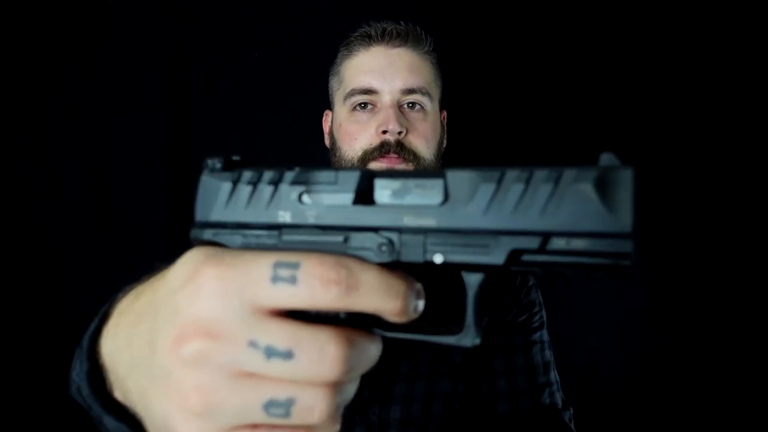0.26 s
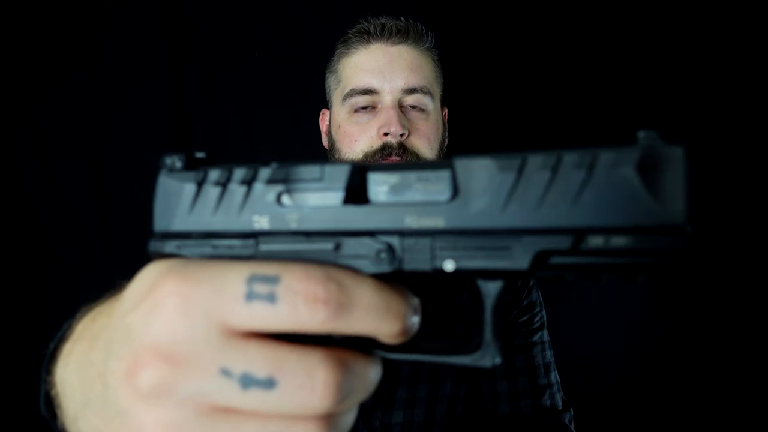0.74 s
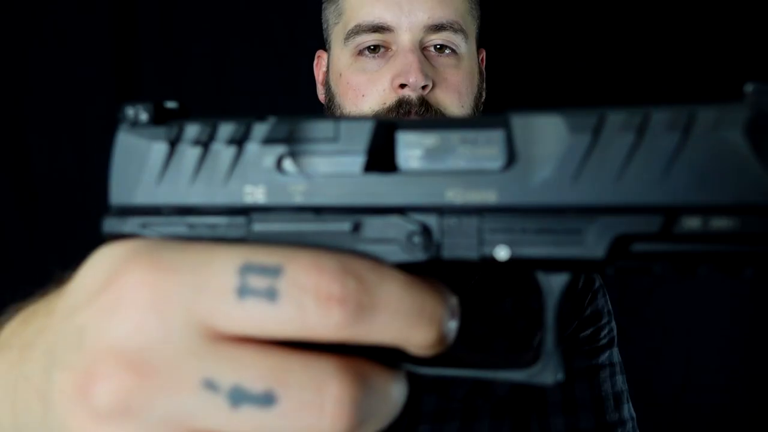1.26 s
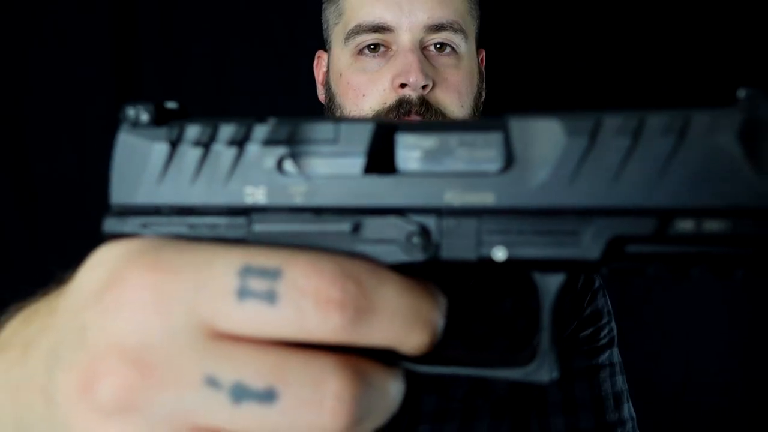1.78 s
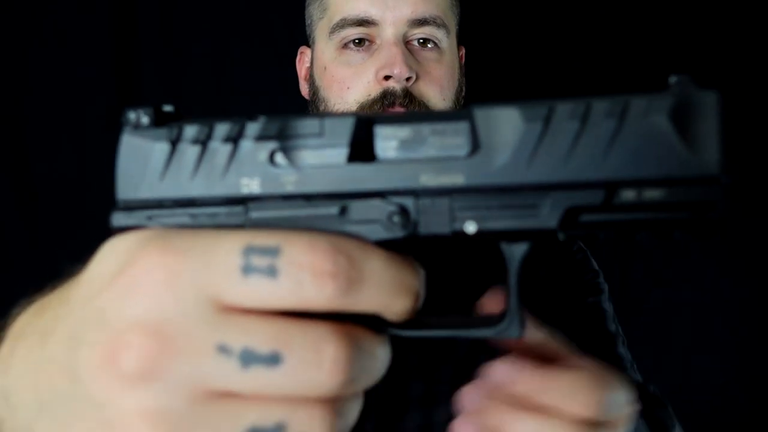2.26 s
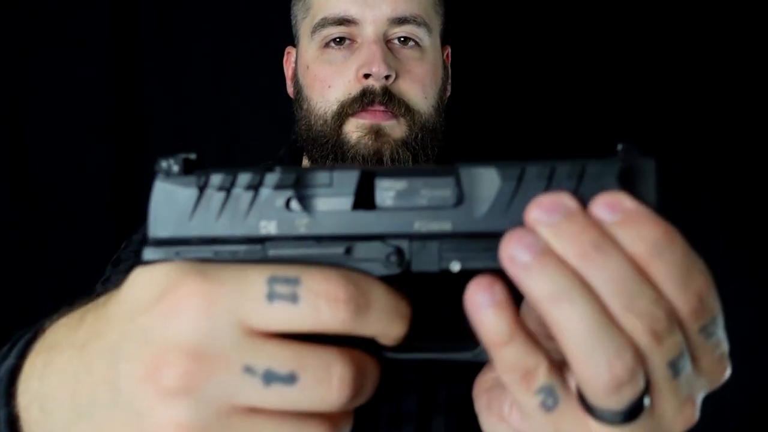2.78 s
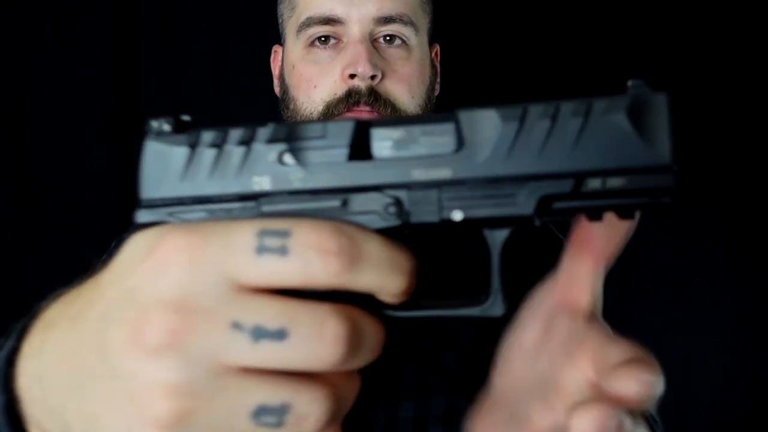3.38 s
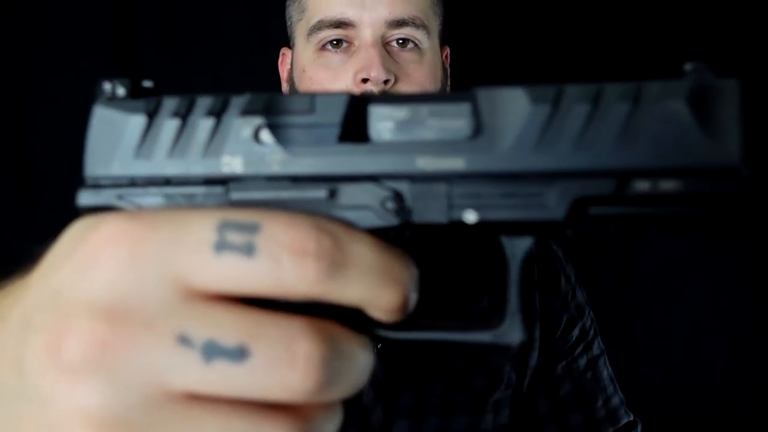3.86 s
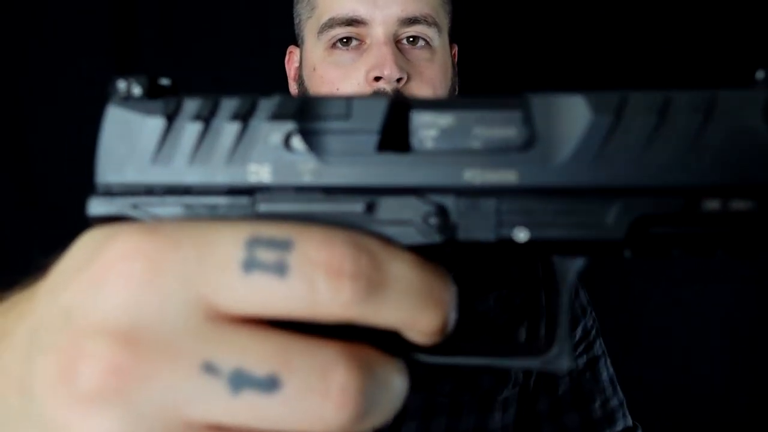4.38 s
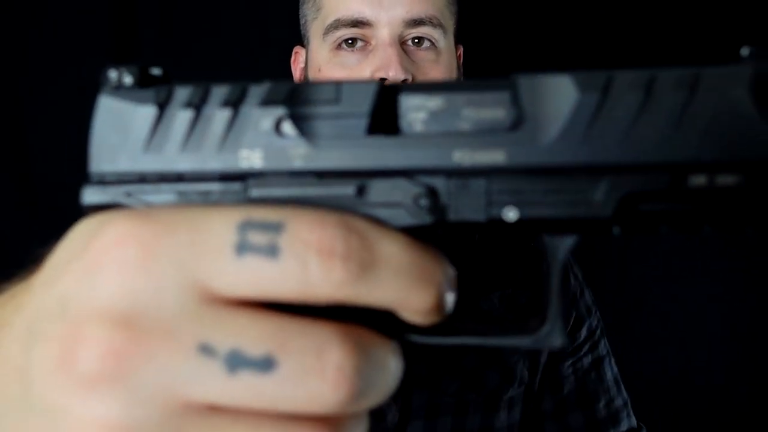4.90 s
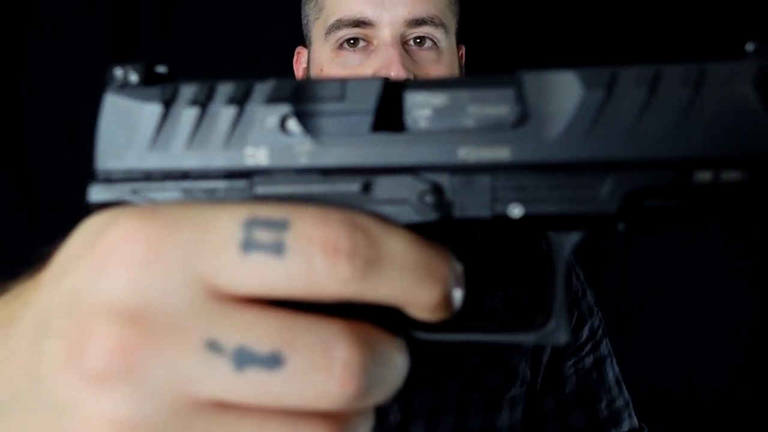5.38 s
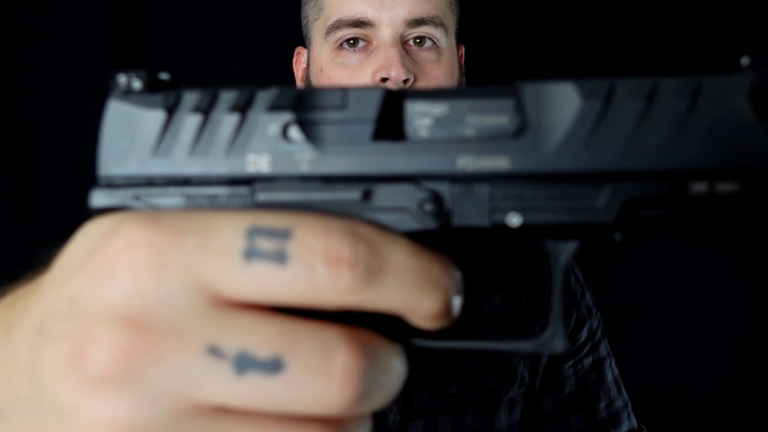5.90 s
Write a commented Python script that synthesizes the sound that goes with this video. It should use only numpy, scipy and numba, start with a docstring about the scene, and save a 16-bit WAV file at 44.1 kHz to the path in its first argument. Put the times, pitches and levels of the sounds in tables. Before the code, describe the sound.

A nearby microphone catches dry-firing indoors: a light tick, a sharp striker snap with tiny bounces, a dull cloth slap, then the two-part clatter of a slide pulled and released. After a quiet gap with faint fabric rustles come two small trigger clicks and another snap. Bright half-second room echoes follow the snaps and rack, with soft rumbling room noise throughout and a low drone only early on.

```python
"""Ticks, snaps and metallic clacks in a bare room: an unloaded pistol is dry-fired close by, a hand slaps cloth
and the slide is racked, over a low rumble, a drone and hiss.
Each contact is a click and a noise rattle through broad modes, plus a noise-built room tail; the barrel is
sines and the background is coloured noise. A compressor squashes the loud blows so that their echoes swell."""
import sys
import numpy as np
from scipy import signal
from scipy.fft import rfft, irfft, next_fast_len
from scipy.io import wavfile
from scipy.ndimage import uniform_filter1d, minimum_filter1d, map_coordinates
from numba import njit

SR = 44100
rng = np.random.default_rng(int(sys.argv[2]) if len(sys.argv) > 2 else 0)


def unload_wav(signal):
    """Save mono or channel-first audio to the path in sys.argv[1] as 16-bit WAV at rate SR, clipped to [-1, 1]."""
    wavfile.write(
        sys.argv[1],
        SR,
        np.round(np.clip(np.atleast_2d(signal).T, -1, 1) * 32767).astype(np.int16),
    )


N = 270729

# Rumble level. Each row: time in seconds, level in dB.
RUMBLE_LEVEL = [(0, -51), (2.5, -57), (3, -51), (3.2, -66), (3.55, -62.5), (4.3, -59), (5.25, -55),
                (5.9, -48), (6.14, -48)]
# Noise spectra. Each row: frequency in Hz, relative density in dB per Hz.
RUMBLE_SPECTRUM = [(12, -72.5), (20, -38), (43, -39), (57, -24), (92, -9.5), (124, -12.5), (151, -2.5),
                   (209, -11), (274, 0), (325, -3), (354, -14), (420, -11), (600, -18.5), (780, -45.5),
                   (1320, -120)]
HISS_SPECTRUM = [(240, -29.5), (400, -10.5), (650, -6.5), (900, -12.5), (1750, -18.5), (2400, -24.5),
                 (4500, -31), (8300, -37), (15300, -39.5), (16500, -57.5)]
DRONE_SPECTRUM = [(53, -42.5), (90, -14), (113, -5), (145, -12.5), (177, -2.5), (248, 1), (322, -6.5),
                  (351, -13.5), (420, -16), (550, -46), (920, -120)]
WHIRR_SPECTRUM = [(1500, -40.5), (2300, 0.5), (2600, 2), (3300, -6), (4500, -19), (6000, -57)]
CLOTH_SPECTRUM = [(1500, -53), (3000, -3.5), (5000, -3), (7000, -4), (10000, -5.5), (16000, -12)]
# Stereo width of background and echoes. Each row: frequency in Hz, left-right likeness from 0 to 1.
BACKGROUND_LIKENESS = [(60, 0.9), (180, 1), (550, 0.7), (1650, 0.36), (4970, 0.15), (15000, 0.53)]
ECHO_LIKENESS = [(100, 0.98), (300, .98), (700, .88), (1650, 0.77), (5000, 0.72), (15000, 0.7)]
# Room decay. Each row: frequency in Hz, time to fall 60 dB in seconds.
ROOM_T60 = [(200, 0.73), (500, 0.53), (1000, 0.63), (3000, 0.58), (7000, 0.51), (12000, 0.36),
            (16000, 0.24)]
# Late filling of the echoes. Each row: frequency in Hz, share missing at the start.
LATE_SHARE = [(1000, 0.0088), (2500, 0.33), (10000, 0.21)]
# Faint cloth rustles. Each row: start in seconds, rise and fall time constants in seconds, level in dB.
RUSTLES_AT = [(2.301, 0.076, 0.18, -60.5), (3.799, 0.015, 0.15, -64), (5.14, 0.051, 0.096, -56)]

# Contacts: hand on cloth, slide on its rails, slide drawn back, slide running home, trigger taking up, letting go.
# Each row: start in seconds, blow energy in dB, tilt in dB per octave, room level in dB relative to the blow.
SLAP_BLOWS = [(2.0835, -3, -1, 0), (2.0915, 1, 1.3, 0.0047)]
RAIL_BLOWS = [(2.8697, 1.7, -5, -8), (2.9805, 7.5, 0.5, 6)]
DRAW_BLOWS = [(2.9045, 5.4, -5.5, -0.5), (2.918, 11, -1.5, -6.5), (2.931, 1.5, 1, 1)]
SLAM_BLOWS = [(3.1405, 0, -3.5, -9.5), (3.143, 6, -3.5, -3.5), (3.1485, 15.5, 0.5, 7.5)]
TICK_BLOWS = [(.5225, -7.5, -2, -6.5)]
RESET_BLOWS = [(5.5875, -7, 0.53, -2.5), (5.7355, -13.5, 0.75, -8.5)]
# Modes of the struck parts. Each row: centre in Hz, width in Hz, level in dB before the blow's tilt.
HAND_MODES = [(216.7, 29, 2.5), (290, 65, -2.5), (417, 190, -3), (846, 630, -7), (1293, 700, -14.5),
              (2460, 340, -25.5), (5900, 2100, -38.5)]
SLIDE_MODES = [(1300, 3800, -5), (2200, 850, 1), (3240, 500, 2), (4100, 280, -25), (5150, 1300, -9),
               (6970, 430, 7.5), (8600, 1900, -6), (11000, 2200, -4.5), (14500, 4000, -13.5)]
RAIL_MODES = [(1220, 160, -10.5), (2040, 530, -9.5), (2850, 150, -3), (3790, 230, 1.5), (5270, 1400, -11.5),
              (6400, 180, 0.5), (9150, 3000, -6), (11400, 3100, -2), (13900, 2500, -4)]
BREECH_MODES = [(813, 96, -16.5), (1549, 440, -7.5), (2440, 820, -9.5), (3410, 460, -2.5), (5230, 1200, -7),
                (5946, 280, -1), (7010, 420, -2), (8140, 650, -4), (10100, 2000, -6.5),
                (13900, 1000, -11.5), (15400, 1000, -15)]
TRIGGER_MODES = [(1230, 160, -7), (2600, 660, -4), (3200, 700, 0), (4210, 500, -0.5), (7400, 1400, -11.5),
                 (10200, 2800, -13), (12500, 2600, -16)]
SEAR_MODES = [(1080, 420, -2), (2195, 250, 1.5), (3380, 1200, -2.5), (5147, 1200, -6.5), (6800, 1300, -6),
              (9200, 3400, -11.5), (13500, 4000, -15.5)]
STRIKER_MODES = [(1160, 59, 1), (1900, 450, -8), (3000, 710, 4), (3770, 1500, 1), (5270, 1400, -3),
                 (7000, 1000, -4), (8280, 700, -1.5), (9810, 680, 3.5), (11800, 2000, -10.5),
                 (16200, 1500, -2)]
# Barrel partials. Each row: frequency in Hz, time to fall 60 dB in seconds.
BARREL_PARTIALS = [(6800, 0.047), (13700, .3)]
# Knocks on the barrel. Each row: start in seconds, level in dB, overtone in dB relative to the fundamental.
BARREL_KNOCKS = [(2.9061, -7.5, -26), (2.921, -11, -33), (2.928, -26.5, -12)]
# Striker falls. Each row: start in seconds, reference blow energy in dB.
STRIKER_FALLS = [(1.658, 14), (6.0938, 9.5)]
# Release, blow and two bounces of a fall. Each row: delay in seconds, energy in dB relative to the reference,
# tilt in dB per octave, room level in dB relative to the contact.
FALL_CONTACTS = [(0, -14.5, -8, -4.5), (.0023, 3.5, 2.5, 2), (.0069, -3, 2, 0), (0.0115, -10, 0, 5)]
# Frame jolts at the blow and first bounce. Each row: delay in seconds, level in dB relative to the reference.
FRAME_JOLTS = [(.0024, -10), (.0066, -22.5)]

HISS_START_DB, HISS_FOLLOW_SHARE = -58, 0.41  # share of the rumble's dB swings
DRONE_DB, WHIRR_DB = -50, -65  # before their common fade
FADE_START_S, FADE_DB_PER_S = 2.35, 52.5
WALL_DELAY_S, WALL_DB = .0047, -16  # nearest surface
LOW_CUT_HZ, TOP_HZ, TOP_EDGE_HZ = 27, 16500, 800


def amp(db):
    """Gain of a dB value."""
    return 10 ** (np.asarray(db) / 20)


def unit(x):
    """x at rms 1."""
    return x / np.sqrt(np.mean(x ** 2) + 1e-20)


def along(points, hz):
    """Interpolate (Hz, value) points on a log frequency axis."""
    f, v = np.transpose(points)
    return np.interp(np.log(hz + 1), np.log(f + 1), v)


def curves(rows):
    """One value per sample for each column after the time."""
    s, *cols = np.transpose(rows)
    return [np.interp(np.arange(N) / SR, s, c) for c in cols]


def wobble(rate_hz):
    """A smooth random curve with rate_hz knots a second."""
    knots = rng.standard_normal(int(N * rate_hz / SR) + 4)
    return map_coordinates(knots, [np.arange(N) * rate_hz / SR])


def filtered(x, response):
    """x through a complex response of frequency, zero-padded."""
    m = next_fast_len(x.shape[-1] + 8192)
    spectrum = rfft(x, m) * response(np.fft.rfftfreq(m, 1 / SR))
    return irfft(spectrum, m)[..., :x.shape[-1]]


def paired(pair, likeness):
    """Mix two unrelated signals to a left-right likeness per frequency."""
    def mid_side_gains(hz):
        turn = np.arccos(np.clip(along(likeness, hz), -1, 1)) / 2
        return np.array([np.cos(turn), np.sin(turn)])
    mid, side = filtered(pair, mid_side_gains)
    return np.array([mid + side, mid - side])


def rush(spectrum, likeness):
    """Coloured stereo noise of rms 1."""
    noise = paired(rng.standard_normal((2, N)), likeness)
    return unit(filtered(noise, lambda hz: amp(along(spectrum, hz))))


def add(out, s, x):
    """Mix x into out from time s."""
    part = out[:, round(s * SR):][:, :x.shape[1]]
    part += x[:, :part.shape[1]]


def background():
    """Lumpy rumble noise and a hiss that partly follows it; drone and narrow hiss fade away together."""
    rumble_db, = curves(RUMBLE_LEVEL)
    rumble = amp(rumble_db) * unit(amp(2 * wobble(18)) * rush(RUMBLE_SPECTRUM, BACKGROUND_LIKENESS))
    hiss_db = HISS_START_DB + HISS_FOLLOW_SHARE * (rumble_db - rumble_db[0])
    hiss = amp(hiss_db) * rush(HISS_SPECTRUM, BACKGROUND_LIKENESS)
    drone = amp(DRONE_DB) * unit(amp(2.7 * wobble(17)) * rush(DRONE_SPECTRUM, BACKGROUND_LIKENESS))
    whirr_db = WHIRR_DB + 1.1 * wobble(29) + 1.5 * wobble(3.4)
    whirr = amp(whirr_db) * rush(WHIRR_SPECTRUM, BACKGROUND_LIKENESS)
    fade_db = FADE_DB_PER_S * np.maximum(np.arange(N) / SR - FADE_START_S, 0)
    return rumble + hiss + amp(-fade_db) * (drone + whirr)


def rustle():
    """Cloth friction: soft, grainy swells of treble noise."""
    t, swell = np.arange(N) / SR, np.zeros(N)
    for s, rise_s, fall_s, db in RUSTLES_AT:
        since = np.maximum(t - s, 0)
        swell += amp(db) * (1 - np.exp(-since / rise_s)) * np.exp(-since / fall_s)
    return swell * amp(2 * wobble(60)) * rush(CLOTH_SPECTRUM, ECHO_LIKENESS)


def echoes(x):
    """Convolve with a fresh noise tail that builds up, each frequency dying at its own speed."""
    hz, t, z = signal.stft(rng.standard_normal((2, SR)), SR, nperseg=256)
    late = np.clip(along(LATE_SHARE, hz)[:, None], 0, 1)
    fill = 1 - late * np.exp(-(t / .07) ** 2)
    decay = amp(-60 * t / along(ROOM_T60, hz)[:, None])
    tail = signal.istft(z * fill * decay, SR, nperseg=256)[1]
    build_up = 1 - np.exp(-np.arange(tail.shape[1]) / SR / 0.0018)
    tail = paired(tail * build_up, ECHO_LIKENESS)
    return signal.fftconvolve(x[None], tail / np.linalg.norm(tail[0]), axes=1)


def rung(push, modes, tilt_db):
    """A push through broad resonances, low-cut just under the first; energy 1."""
    low = 0.89 * modes[0][0]
    pivot = modes[2][0]  # the tilt turns about the third mode

    def response(f):
        body = 0
        for k, (c, w, db) in enumerate(modes):
            gain = (-1) ** k * amp(db + tilt_db * np.log2(c / pivot))
            body = body + gain * 1j * f * w / (c * c - f * f + 1j * f * w)
        low_cut = f * f / (f * f - low * low - 1.2j * f * low + 1)
        return body * low_cut ** 2

    x = filtered(push, response)
    return x / np.linalg.norm(x)


def struck(rows, modes, rattle_s, sharp=5):
    """Each contact: a direct click and decaying rattle, a wall reflection, and an impulse spread by the room."""
    out, t = np.zeros((2, N)), np.arange(SR // 10) / SR
    for s, db, tilt_db, room_db in rows:
        push = np.exp(-t / rattle_s) * rng.standard_normal(len(t)) + sharp * (t == 0)
        direct = amp(db) * rung(push, modes, tilt_db) * np.ones((2, 1))
        add(out, s, direct)
        add(out, s + WALL_DELAY_S, amp(WALL_DB) * direct)
        add(out, s, amp(db + room_db) * echoes(rung(1 * (t == 0), modes, tilt_db)))
    return out


def slap():
    """The free hand slaps cloth: a long contact through low modes."""
    return struck(SLAP_BLOWS, HAND_MODES, 0.0054, sharp=12)


def barrel():
    """Knocked by the slide, the barrel sings briefly: two decaying sines with a common phase waver."""
    out, t = np.zeros((2, N)), np.arange(SR // 3) / SR
    for s, ring_db, overtone_db in BARREL_KNOCKS:
        waver = np.cumsum(rng.normal(0, 0.11, len(t)))
        ring = 0
        for (hz, t60_s), db in zip(BARREL_PARTIALS, (0, overtone_db)):
            ring = ring + amp(db - 60 * t / t60_s) * np.sin(2 * np.pi * hz * t + waver)
        ring = amp(ring_db) * ring * (1 - np.exp(-t / 0.00072))
        add(out, s, ring * np.ones((2, 1)))
        add(out, s, amp(-7) * echoes(ring))
    return out


def slide():
    """The slide knocks its rails, is drawn back, knocks them again and runs home, through modes for each."""
    rails = struck(RAIL_BLOWS, RAIL_MODES, 0.001, sharp=9)
    drawn = struck(DRAW_BLOWS, SLIDE_MODES, 0.002)
    home = struck(SLAM_BLOWS, BREECH_MODES, 0.0016)
    return rails + drawn + home + barrel()


def trigger():
    """The trigger takes up with a tick and later lets go, as short rattles through metal modes."""
    take_up = struck(TICK_BLOWS, TRIGGER_MODES, 0.003, sharp=19)
    return take_up + struck(RESET_BLOWS, SEAR_MODES, 0.0017, sharp=4.4)


def striker():
    """Every fall repeats release, blow and bounces, with dull frame jolts as pulses of air."""
    out, u = np.zeros((2, N)), np.arange(SR // 20) / SR / 0.00035
    jolt = u * (2 - u) * np.exp(-u) * np.ones((2, 1))
    for s, db in STRIKER_FALLS:
        contacts = [(s + later_s, db + rel_db, tilt_db, room_db)
                    for later_s, rel_db, tilt_db, room_db in FALL_CONTACTS]
        out += struck(contacts, STRIKER_MODES, 0.00062)
        for later_s, rel_db in FRAME_JOLTS:
            add(out, s + later_s, amp(db + rel_db) * jolt)
    return out


def scene():
    """Background, cloth, hand and pistol in the room."""
    return background() + rustle() + slap() + slide() + trigger() + striker()


@njit
def released(cut_db, step_db):
    """The cut follows rises at once and falls by at most a fixed step per sample."""
    out = cut_db.copy()
    for i in range(1, len(out)):
        out[i] = max(out[i], out[i - 1] - step_db)
    return out


def squeezed(x, threshold_db, share, ahead_s, smooth_s, release_db_per_s):
    """Look-ahead gain control, keyed by the treble, removing a share of the level above a threshold."""
    treble = np.diff(x, prepend=0)
    power = uniform_filter1d(np.mean(treble ** 2, 0), max(round(smooth_s * SR), 1))
    over_db = np.maximum(10 * np.log10(np.abs(power) + 1e-12) - threshold_db, 0)
    cut_db = np.clip(share, 0, 1) * over_db
    span = max(round(ahead_s * SR), 2)
    cut_db = -minimum_filter1d(-cut_db, 2 * span)  # hold the maximum
    return x * amp(-uniform_filter1d(released(cut_db, release_db_per_s / SR), span))


def record(dry):
    """A compressor set by the blows, a quick peak limiter, then a low cut and the band limit."""
    x = squeezed(dry, -23.5, 0.51, 0.0014, 0.0018, 160)
    x = squeezed(x, -19.5, 0.54, 0.00063, 0.00046, 2500)

    def band(hz):
        top = np.sin(np.pi / 2 * np.clip((TOP_HZ - hz) / TOP_EDGE_HZ, 0, 1)) ** 2
        low_cut = (1j * hz / (LOW_CUT_HZ + 1j * hz)) ** 2
        return top * low_cut
    return filtered(x, band)


dry = scene()
out = record(dry)
unload_wav(out)
```